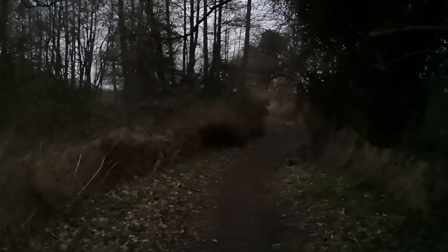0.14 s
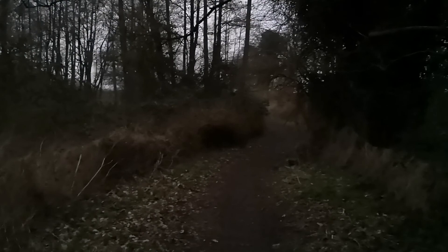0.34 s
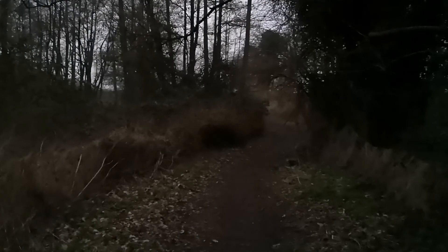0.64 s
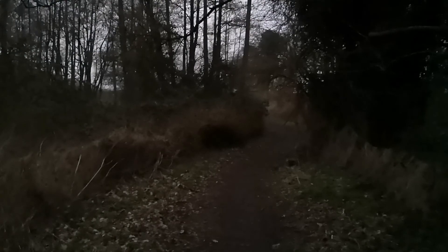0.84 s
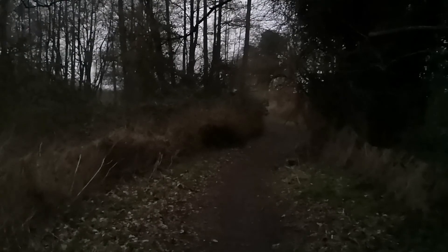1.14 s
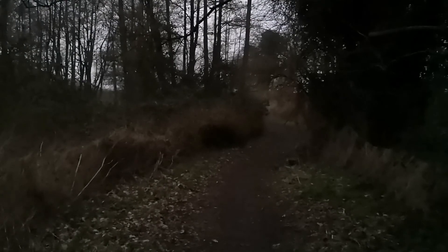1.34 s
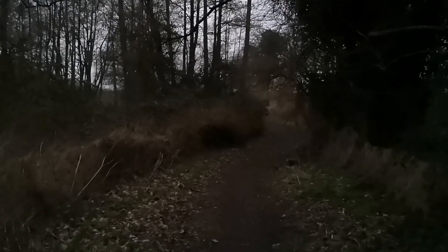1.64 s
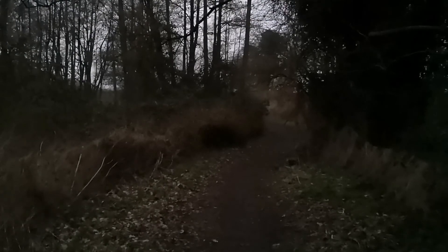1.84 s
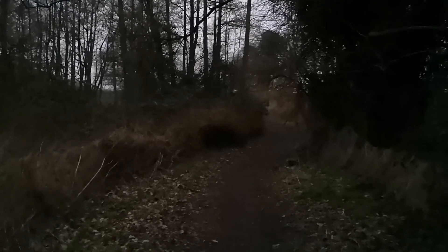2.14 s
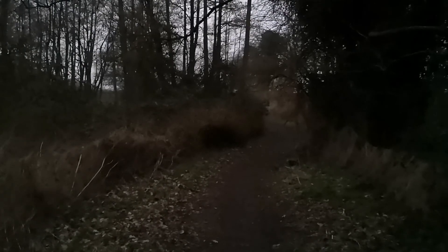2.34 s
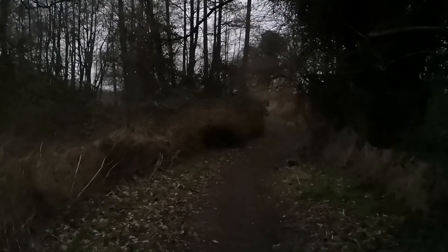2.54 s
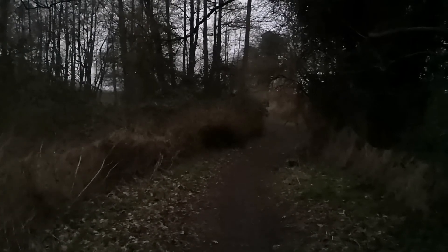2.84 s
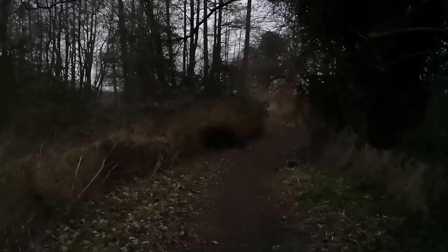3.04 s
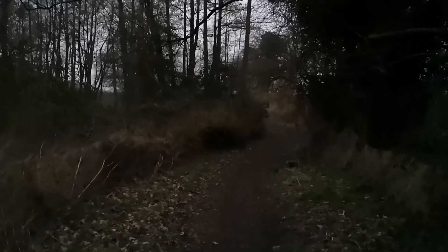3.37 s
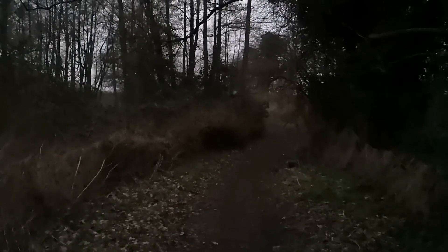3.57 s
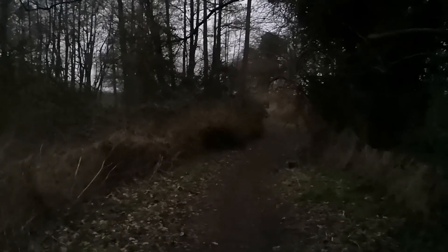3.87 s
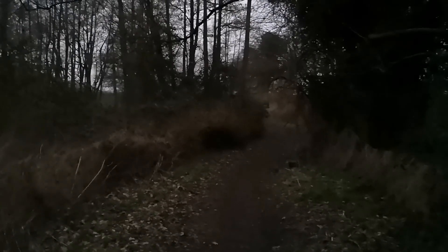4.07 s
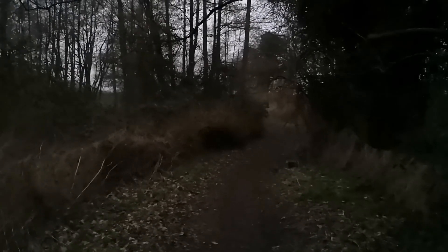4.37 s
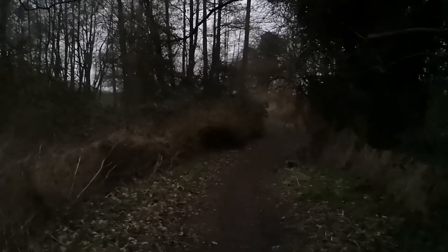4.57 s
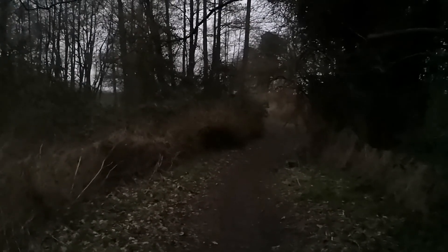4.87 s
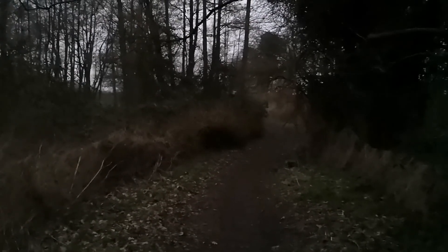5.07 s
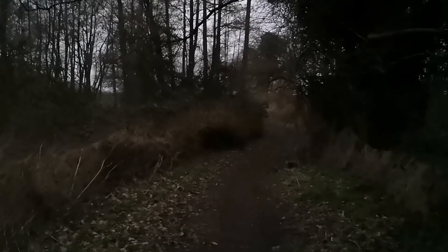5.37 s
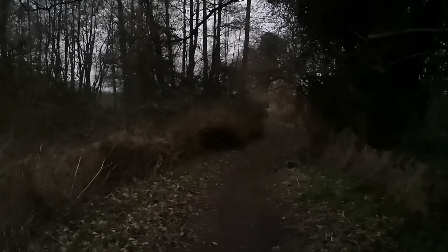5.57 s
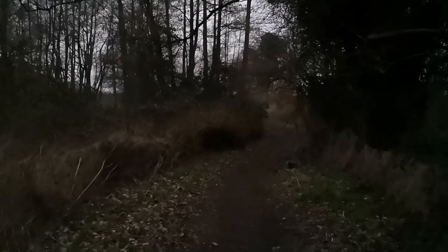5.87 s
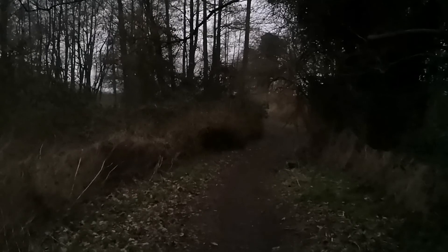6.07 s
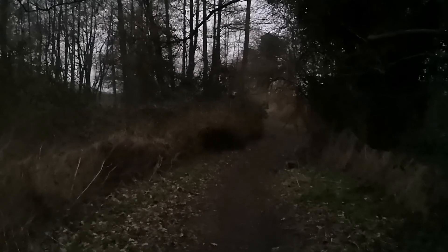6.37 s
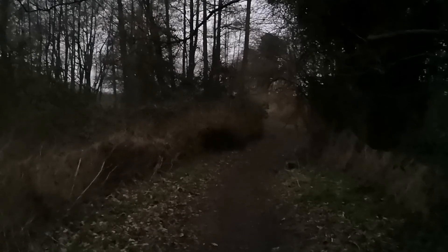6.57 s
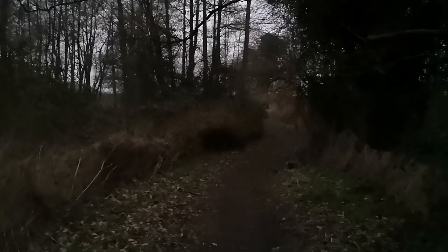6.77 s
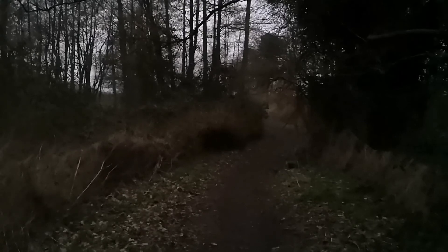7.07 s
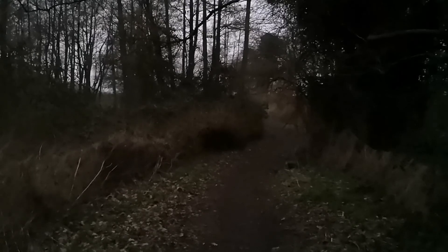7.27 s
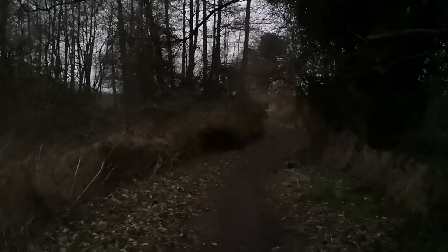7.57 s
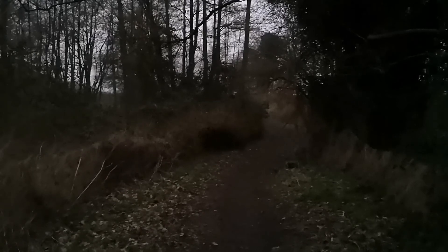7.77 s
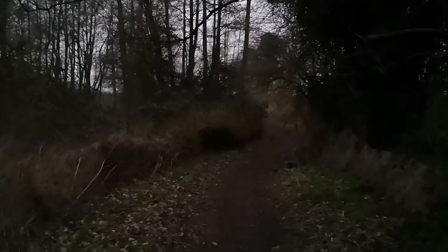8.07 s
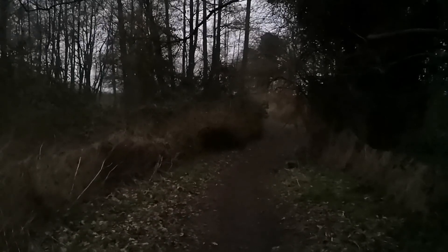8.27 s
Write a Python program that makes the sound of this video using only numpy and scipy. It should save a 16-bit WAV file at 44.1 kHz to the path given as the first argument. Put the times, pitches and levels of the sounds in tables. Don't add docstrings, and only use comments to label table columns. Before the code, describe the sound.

A deer yelps sharply in quick pairs close on the left, a hoarser one barks farther off, over low traffic rumble and a faint brook.

```python
import sys
import numpy as np
from scipy import signal
from scipy.fft import rfft, irfft, next_fast_len
from scipy.io import wavfile
from scipy.ndimage import uniform_filter1d

SR = 44100
rng = np.random.default_rng(int(sys.argv[2]) if len(sys.argv) > 2 else 0)


def invert_db(x):
    u = np.asarray(x, float) / 20
    return 10 ** u


def unload_audio(sound):
    columns = np.transpose(np.atleast_2d(sound))
    steps = np.round(np.clip(columns, -1, 1) * 32767)
    wavfile.write(sys.argv[1], SR, steps.astype(np.int16))


N = 371322
BROOK_LEAD = 19


def near_deer():
    # start in seconds, length in seconds, peak effort in dB, pitch in Hz, roughness 0-1.
    yelps = [(-.145, 0.043, -37, 998, 0.33), (-.042, .064, -32, 1001, .19), (.6105, .049, -29.5, 990, .42),
             (.729, .065, -26.5, 1009, .23), (1.863, .047, -32.5, 1002, .33),
             (1.964, .068, -27.5, 1022, .2), (3.622, .044, -34.5, 990, .35), (3.722, .068, -27.5, 987, .27),
             (6.523, .039, -34.5, 985, .42), (6.621, .064, -27.5, 997, .3)]
    # frequency in Hz, strength in dB.
    throat = [(600, -19), (1000, 4.5), (1500, 11), (2000, 4), (2900, -11.5), (3900, 8), (5000, -0.5),
              (6000, -15), (8200, -23), (9300, -20), (11000, -37)]
    # frequency in Hz, width in Hz, level in dB.
    resonances = [(750, 310, -10), (1600, 830, -4), (2970, 680, -7), (3644, 410, 1.5), (4170, 1000, -9.5),
                  (5420, 1100, -4.5), (7240, 950, -14.5), (9460, 450, -25), (13800, 3000, -22)]
    # frequency in Hz, left minus right in dB.
    side = [(60, 0.0), (130, 11), (290, 14), (640, 0), (1410, 1.5), (3100, 2.5), (6000, 0), (12000, 4)]
    # attack in seconds, share of length at peak effort, effort at start
    # and at end in dB, pitch offset at start (ratio), its settling in seconds, pitch sag to the end (ratio),
    # extra roughness at start, second fold mode in dB.
    opener = (.0035, .5, -3, -3, .01, .011, .045, .03, -11)
    answer = (.021, .5, -9.5, -8, -.05, .01, .014, .09, -11)
    return deer(yelps, throat, resonances, side, breath_db=-3.5, hoarse=0.1, kinds=(opener, answer),
                lag=-15.5, wet_db=-2, early_db=14)


def far_deer():
    # start in seconds, length in seconds, peak effort in dB, pitch in Hz, roughness 0-1.
    barks = [(.431, .118, -41.5, 1014, .48), (4.879, .1, -40, 1034, .34)]
    # frequency in Hz, strength in dB.
    throat = [(600, -17), (1050, -3.5), (1500, 3), (2050, -5.5), (3050, -5.5), (4120, -1.5), (4400, -7),
              (5100, -6), (6000, -24), (8200, -25), (9300, -51), (11000, -42)]
    # frequency in Hz, width in Hz, level in dB.
    resonances = [(780, 260, -12.5), (2200, 1100, -7.5), (3100, 500, -7.5), (3750, 360, -2), (4100, 84, -2),
                  (5470, 1100, -3), (7200, 1700, -8.5), (9000, 1300, -19.5), (13600, 3600, -25)]
    # frequency in Hz, left minus right in dB.
    side = [(60, -6), (180, 14), (550, -5.5), (1650, -2), (4970, 3.5), (15000, -7.5)]
    # attack in seconds, share of length at peak effort, effort at start and at end in dB,
    # pitch offset at start (ratio), its settling in seconds, pitch sag to the end (ratio),
    # extra roughness at start, second fold mode in dB.
    single = (.007, .75, -7, -3.5, .11, .02, .006, .42, -9.5)
    sound = deer(barks, throat, resonances, side, breath_db=2.5, hoarse=1.65, kinds=(single,),
                 lag=3, wet_db=-2.5, early_db=9)
    return invert_db(0.93) * sound


def deer(yelps, throat, resonances, side, breath_db, hoarse, kinds, lag, wet_db, early_db):
    ahead = 0.2
    out = np.zeros((N + round(ahead * SR), 2))
    for k, (s, *row) in enumerate(yelps):
        voice = yelp(row, kinds[k % len(kinds)], throat, resonances, breath_db, hoarse)
        voice = np.pad(voice, 20)
        add(out, s + ahead, ports(voice, lag, 0).T)
        add(out, s + ahead, invert_db(wet_db) * trees(voice, early_db).T)
    size = next_fast_len(len(out))
    hz = np.fft.rfftfreq(size, 1 / SR)
    shade = invert_db(np.outer(read(side, hz), [.5, -.5]))
    shade *= 0.096 + 0.76 / (1 + (hz[:, None] / 10500) ** 10)
    return irfft(rfft(out, size, axis=0) * shade, size, axis=0)[len(out) - N:len(out)].T


def yelp(row, kind, throat, resonances, breath_db, hoarse):
    t, effort_db, hz, rough, second_db, rise = unfold(*row, kind)
    rough = np.clip(rough, 0, 1)
    hz = hz * (1 - 0.066 * np.exp((t - t[-1]) / 0.0061))
    turns = np.cumsum(hz * (1 + .045 * rough * wander(len(t), span=90))) / SR
    second = np.cumsum((.5 + .4 * rough) * hz * (1 + 0.063 * wander(len(t), span=220))) / SR
    start = rng.random(12)
    catch = np.clip((t - t[0]) / 0.00746, 0, 1)
    folds = between = breath = 0
    for k in range(1, 12):
        dulled = (1 - .5 * rough) ** (hoarse * (k > 1))
        level = catch ** (1.7 / k) * dulled * invert_db(read(throat, k * hz))
        folds = folds + level * np.cos(2 * np.pi * (k * turns + start[k]))
    for k in range(11):
        level = invert_db(read(throat, (k + 0.73) * hz))
        between = between + level * np.cos(2 * np.pi * (k * turns + second + start[k]))
    puffs = (0.63 + np.exp(-(turns % 1) / 0.16)) * chance(len(t))
    for k, (f, width, db) in enumerate(resonances):
        ring = resonate(resonate(puffs, f, width), f, width)
        breath = breath + (-1) ** k * invert_db(db) * ring / np.sqrt(width)
    shimmer = invert_db(4 * rough * wander(len(t), span=110))
    voice = shimmer * (evened(folds) + catch * invert_db(second_db - 3.5) * evened(between))
    mix = voice + invert_db(breath_db) * (0.28 + rough) * evened(breath)
    gate = np.clip(np.minimum((t - t[0]) / rise, (t[-1] - t) / 0.0032), 0, 1)
    return invert_db(effort_db) * mix * np.sin(np.pi / 2 * gate) ** 2


def unfold(length, peak_db, pitch_hz, rough, kind):
    rise, share, first_db, last_db, offset, settle, sag, raw, second_db = kind
    t = np.arange(0, length, 1 / SR)
    effort_db = peak_db + np.interp(t / length, [0, np.clip(share, .1, .9), 1], [first_db, 0, last_db])
    hz = pitch_hz * (1 + offset * np.exp(-t / settle) - sag * (t / length) ** 2)
    return t, effort_db, hz, rough + raw * np.clip(1 - t / length / share, 0, 1), second_db, rise


def trees(x, early_db):
    # frequency in Hz, time to die by 60 dB in seconds.
    die_away = [(700, 0.85), (1000, 0.58), (2000, 0.82), (4000, 0.67), (8000, 0.76)]
    early_fade = 0.1
    taps = np.zeros((2, 30020))
    at = np.arange(300, 30000, 20) + rng.integers(0, 20, (2, 1485))
    sign = rng.choice([-1., 1.], at.shape)
    strength = rng.exponential(1, at.shape) ** 1.4
    np.put_along_axis(taps, at, sign * strength, 1)
    hz, t, z = signal.stft(taps, SR, nperseg=256)
    z *= invert_db(-60 * t / read(die_away, hz)[:, None] + early_db * np.exp(-t / early_fade))
    tail = signal.istft(z, SR, nperseg=256)[1]
    return signal.fftconvolve(x[None], tail / np.linalg.norm(tail, axis=1, keepdims=True), axes=1)


def bird():
    # start in seconds, level in dB, top pitch in Hz, share by which it falls, upper voice in dB.
    chips = [(2.355, -70, 4480, .07, -77), (2.595, -74.5, 4510, .02, -78), (4.025, -76, 4370, .07, -76),
             (4.26, -77, 4480, .03, -84), (7.772, -73, 4480, 0.081, -67.5), (8.003, -75, 4400, .05, -79)]
    # start in seconds, length in seconds, level in dB, pitch in Hz.
    hoot = (.9, .5, -68.5, 1274)
    chip_s, top_s, bend_s = .048, .012, .012
    out, t = np.zeros((N, 2)), np.arange(0, chip_s, 1 / SR)
    below = 1 - np.exp(-((t - top_s) / bend_s) ** 2)
    upper_hz = 6250 * (1 - .11 * below)
    upper = invert_db(-5 * t / chip_s) * np.sin(2 * np.pi * np.cumsum(upper_hz) / SR)
    for s, db, hz, fall, upper_db in chips:
        lower_hz = hz * (1 - fall * below * np.minimum(t / top_s, 1))
        lower = np.sin(2 * np.pi * np.cumsum(lower_hz) / SR)
        chip = (invert_db(db + 2.0) * lower + invert_db(upper_db) * upper) * signal.windows.tukey(len(t), .4)
        add(out, s, ports(chip, 8.5, left_db=-5).T)
        add(out, s, invert_db(1) * trees(chip, early_db=6).T)
    s, length, db, hz = hoot
    add(out, s, ports(swell(length, db, hz, width=36, order=1), 0, left_db=-3.0).T)
    return out.T


def brook():
    # start in seconds, peak in dB, pitch in Hz.
    bubbles = [(1.0091, -55, 2120), (1.2092, -54.5, 2100), (1.3124, -62, 2010), (1.4247, -60, 2040),
               (2.5436, -57, 1750), (2.6, -58, 1600), (2.6404, -61, 1920), (2.825, -57, 2110),
               (2.9667, -53.5, 1410), (3.0834, -57.5, 1940), (3.1323, -55, 2100), (3.1667, -59, 2000),
               (3.868, -46, 2200), (3.5478, -49, 1180), (4.0986, -60, 2240), (4.2004, -61, 2200),
               (4.2393, -53.5, 2940), (4.356, -59, 2180), (4.5441, -59, 2030), (4.6234, -57.5, 1950),
               (4.7257, -63, 2020), (5.3203, -53.5, 2010), (5.8935, -59, 2150), (5.9314, -58.5, 2140),
               (6.3175, -52.5, 1550), (6.3684, -51, 1590), (6.9995, -59, 2250), (7.428, -59, 1990),
               (7.7298, -59, 2520), (8.3434, -69, 2180)]
    # start in seconds, peak in dB, pitch in Hz.
    splashes = [(1.3912, -68, 5000), (1.714, -70, 5210), (1.7424, -67, 6570), (2.5765, -70, 4510),
                (3.495, -63, 4270), (3.5179, -67, 6520), (5.8486, -67, 6300), (5.902, -62, 7250),
                (5.9818, -69, 6380), (6.4572, -69, 6400), (6.4941, -63, 5370), (7.167, -62, 5110),
                (7.209, -65, 7200), (7.5602, -68, 5240)]
    # start in seconds, peak in dB.
    twigs = [(.4354, -65.5), (.8674, -60)]
    out = np.zeros(N)
    for when, pitch, size in rng.random((1500, 3)):
        hz = 1000 * 7.5 ** pitch
        db = -72 - 4.1 * abs(np.log2(hz / 2100)) + 6.8 * size ** 2
        add(out, when * N / SR, invert_db(db) * bubble(hz, cycles=5.2, rise=0.0065))
    for s, db, hz in bubbles:
        add(out, s, invert_db(db) * bubble(hz, cycles=4.5, rise=0.0091))
    for s, db, hz in splashes:
        add(out, s, invert_db(db) * bubble(hz, cycles=6.0, rise=.02))
    for s, db in twigs:
        crack = resonate(resonate(rng.standard_normal(900), 6000, 9700), 6100, 9700)
        add(out, s, invert_db(db + 5 - 60 * np.arange(900) / SR / 0.06) * crack)
    return ports(out, BROOK_LEAD, left_db=-5.5)


def bubble(hz, cycles, rise):
    u = np.arange(0, 8, hz / cycles / SR)
    return np.sin(2 * np.pi * cycles * (u + rise * u ** 2)) * u ** .5 * np.exp(.5 - u) * np.sqrt(2)


def traffic():
    # time in seconds, level in dB.
    hum = [(0.0, -69), (0.91, -62), (2.81, -70), (3.82, -68.5), (4.459, -65), (4.81, -63), (6.28, -65),
           (6.68, -64), (7.13, -64.5), (8.42, -62.5)]
    # start in seconds, length in seconds, level in dB, pitch in Hz.
    moans = [(.45, 0.29, -74, 328), (4.76, .55, -65, 332), (7.55, 0.23, -71.5, 335)]
    s, db = np.transpose(hum)
    drone = evened(resonate(rng.standard_normal(N), 95, 8))
    out = invert_db(np.interp(np.arange(N) / SR, s, db) - 4) * drone
    for s, length, db, hz in moans:
        add(out, s, swell(length, db, hz, width=56, order=2))
    return out


def swell(length, db, hz, width, order):
    fuzz = chance(round(length * SR))
    for _ in range(order):
        fuzz = resonate(fuzz, hz, width)
    return invert_db(db) * evened(fuzz) * np.hanning(len(fuzz))


def air():
    # frequency in Hz, level in dB per Hz.
    spectrum = [(12, -31), (20, -5), (44, 3), (70, -7.5), (98, -16.5), (126, -14.5), (166, -21),
                (320, -22.5), (535, -32.5), (950, -25), (2090, -22), (3650, -32.5), (8420, -42),
                (15500, -48.5)]
    # frequency in Hz, likeness of left and right 0-1.
    alike = [(60, .985), (130, 0.78), (290, 0.2), (500, 0.17), (1500, 0.32), (3000, 0.18), (7000, 0.11),
             (12000, 0.15)]
    frames, hz = N // 256 + 5, np.fft.rfftfreq(1024, 1 / SR)
    a, b, c, d, patches = rng.standard_normal((frames, 513, 5)).T
    patches = evened(uniform_filter1d(uniform_filter1d(patches, 10, 0), 5, 1))
    brook_band = np.exp(-(np.log((hz + 1) / 2300) / 2.6) ** 2)[:, None]
    same, right = np.clip(read(alike, hz), -1, 1)[:, None], a + 1j * b
    late = np.exp(-2j * np.pi * hz * BROOK_LEAD / SR * (hz > 450))[:, None]
    left = same * late * right + np.sqrt(1 - same ** 2) * (c + 1j * d)
    lean_db = np.array([-.7, .7])[:, None, None] * brook_band
    z = np.array([left, right])
    z *= invert_db(read(spectrum, hz)[:, None] + (0.48 + 1.9 * brook_band) * patches + lean_db)
    return invert_db(-59) * evened(signal.istft(z, nperseg=1024, noverlap=768)[1][:, :N])


def ports(x, lag, left_db):
    return np.array([np.roll(x, round(lag)) * invert_db(left_db / 2), x * invert_db(-left_db / 2)])


def resonate(x, hz, width):
    turn = np.exp(2j * np.pi * np.cumsum(hz * np.ones(len(x))) / SR)
    r = np.exp(-np.pi * width / SR)
    return 2 * (turn * signal.lfilter([1 - r], [1, -r], x / turn + 1e-18)).real


def wander(count, span):
    return evened(uniform_filter1d(uniform_filter1d(chance(count), int(span)), int(span)))


def chance(count):
    return rng.standard_normal(30000)[:count]


def evened(x):
    return x / np.sqrt(np.mean(x ** 2) + 1e-20)


def read(points, hz):
    f, value = np.transpose(points)
    return np.interp(np.log(hz + 1), np.log(f + 1), value)


def add(mix, s, sound):
    part = mix[round(s * SR):][:len(sound)]
    part += sound[:len(part)]


def scene():
    return near_deer() + far_deer() + air() + traffic() + brook() + bird()


def band_limit(x):
    return signal.sosfilt(signal.butter(12, 15700, fs=SR, output="sos"), x)


def record(dry):
    bass = signal.sosfiltfilt(signal.butter(2, 260, fs=SR, output="sos"), dry)
    power = uniform_filter1d(((dry - bass) ** 2).mean(0), 1500)
    loud_db = 10 * np.log10(abs(power) + 1e-12)
    opened = np.clip((loud_db + 46.5) / 14.0, 0, 1)
    opened = uniform_filter1d(np.roll(opened, 2400), 1500)
    mix = dry + bass * (invert_db(5.8 * opened) - 1)
    return band_limit(mix)


dry = scene()
out = record(dry)
unload_audio(out)
```